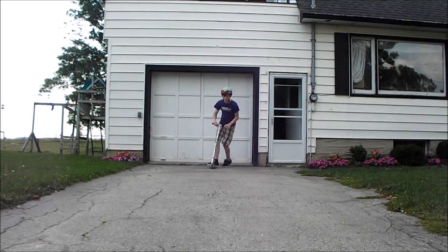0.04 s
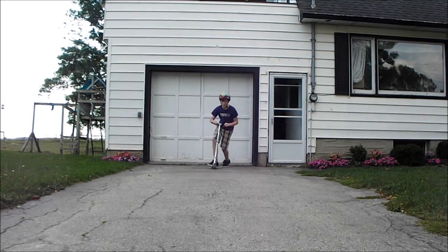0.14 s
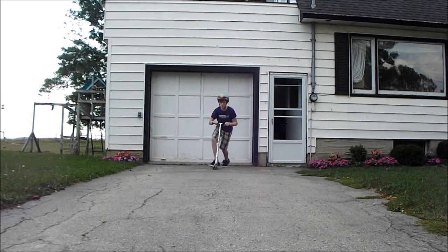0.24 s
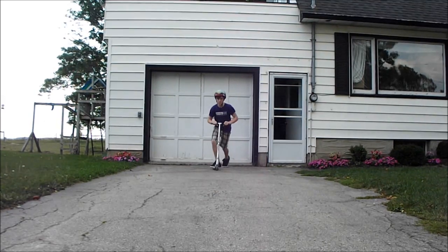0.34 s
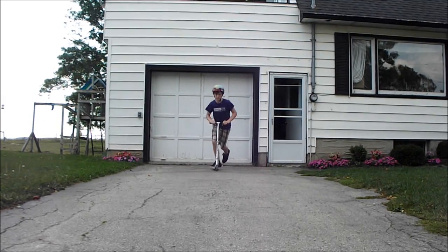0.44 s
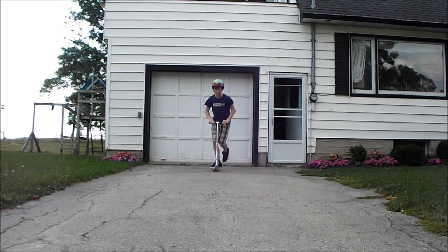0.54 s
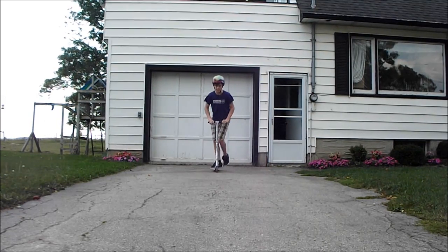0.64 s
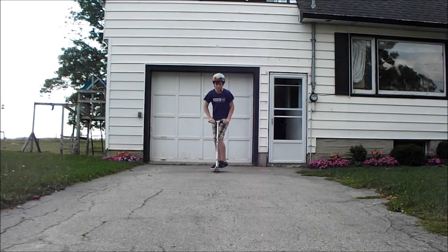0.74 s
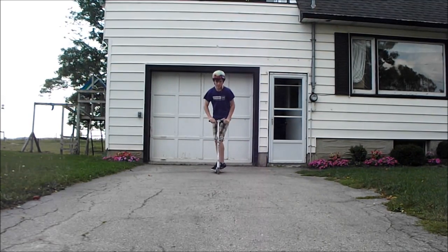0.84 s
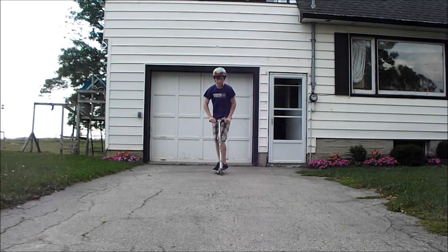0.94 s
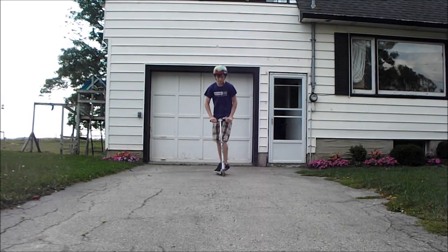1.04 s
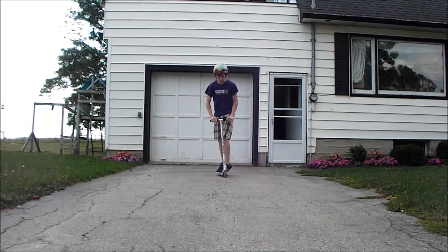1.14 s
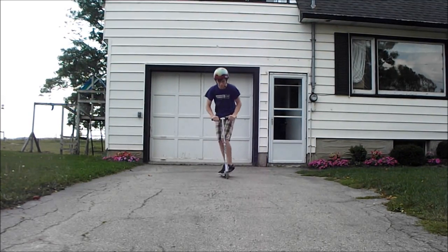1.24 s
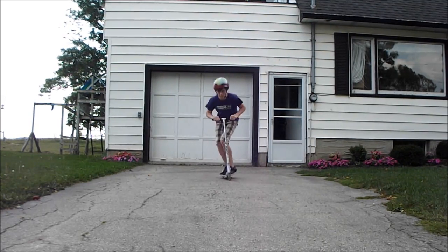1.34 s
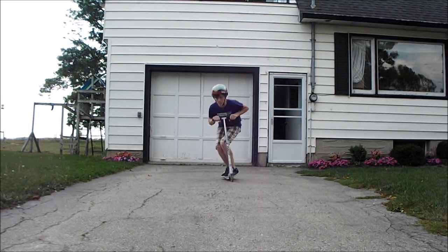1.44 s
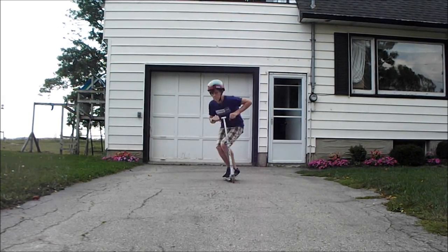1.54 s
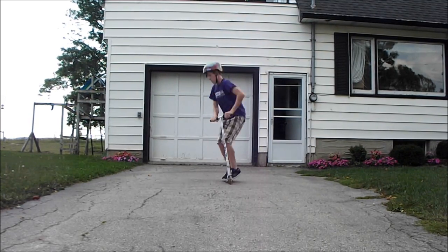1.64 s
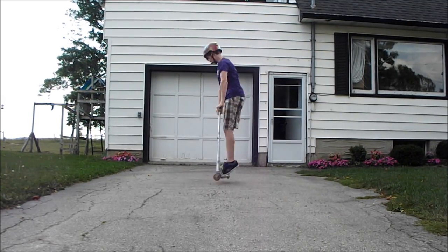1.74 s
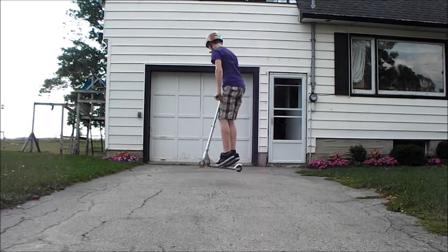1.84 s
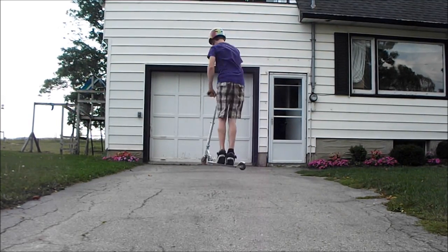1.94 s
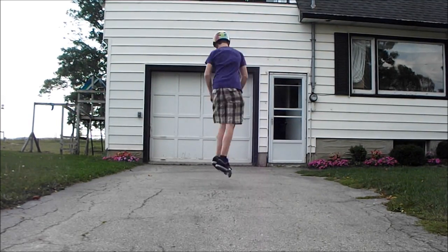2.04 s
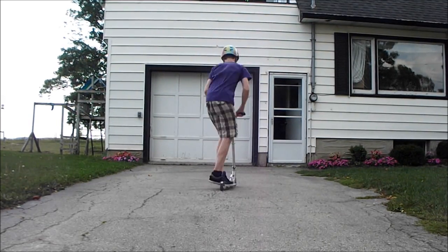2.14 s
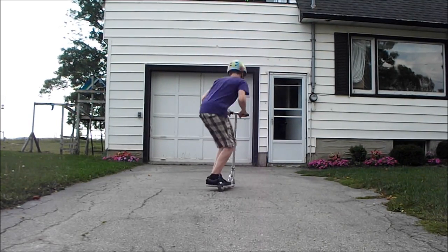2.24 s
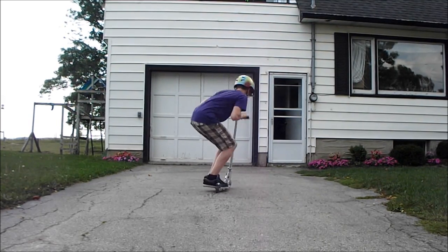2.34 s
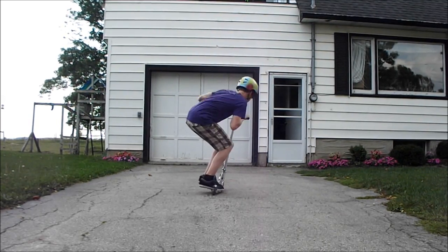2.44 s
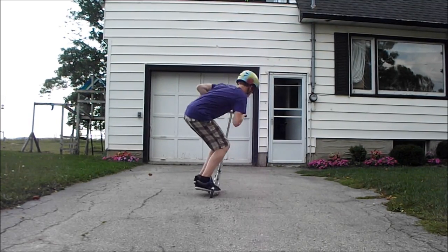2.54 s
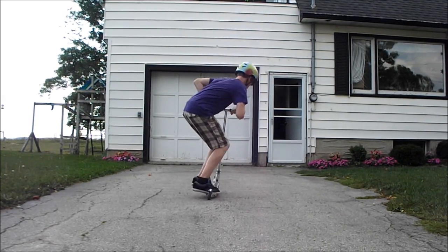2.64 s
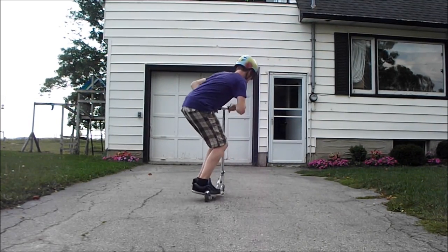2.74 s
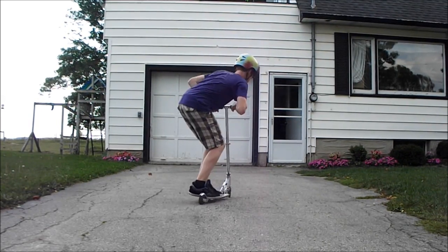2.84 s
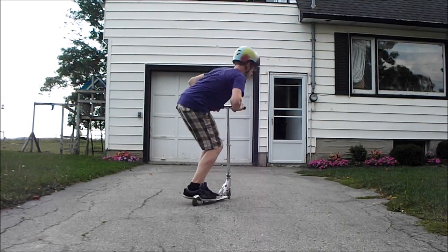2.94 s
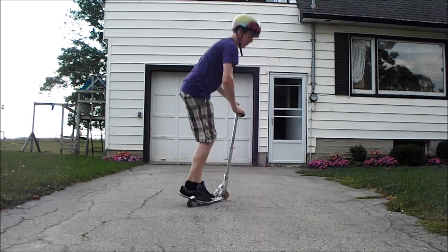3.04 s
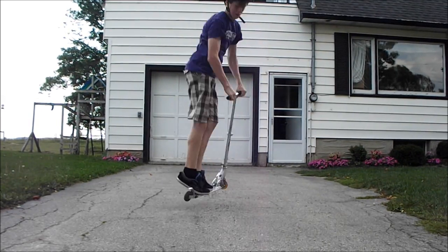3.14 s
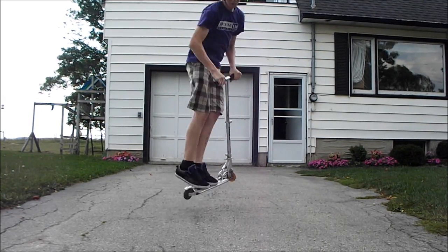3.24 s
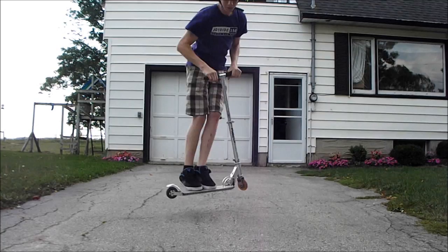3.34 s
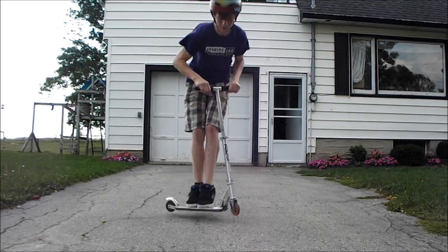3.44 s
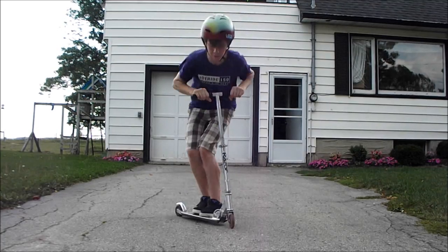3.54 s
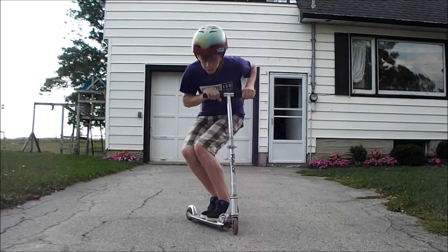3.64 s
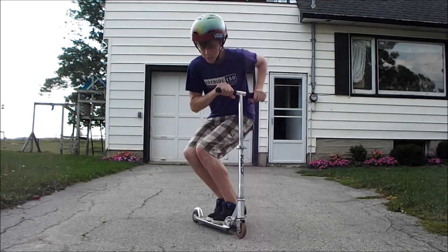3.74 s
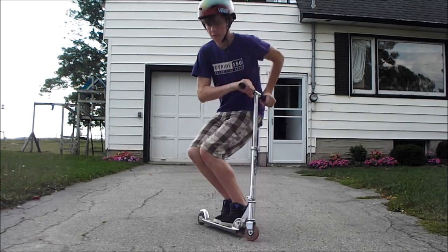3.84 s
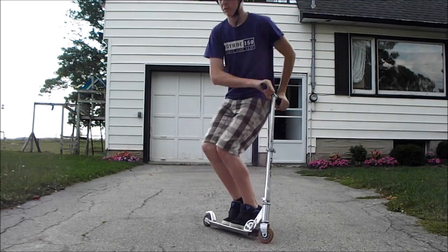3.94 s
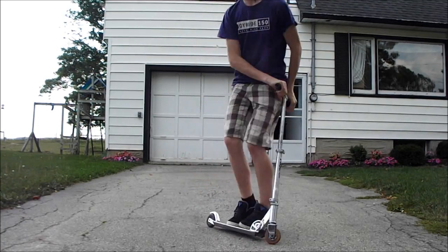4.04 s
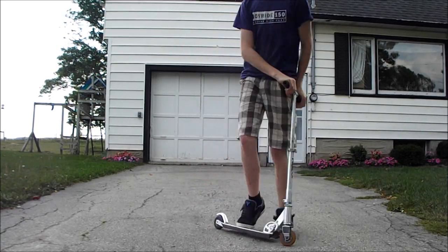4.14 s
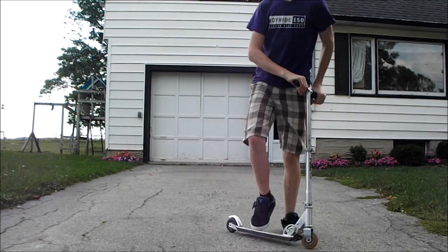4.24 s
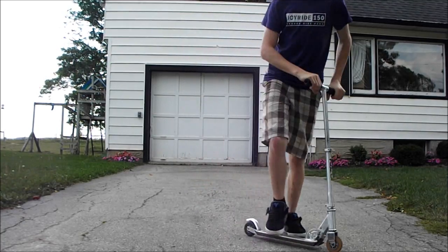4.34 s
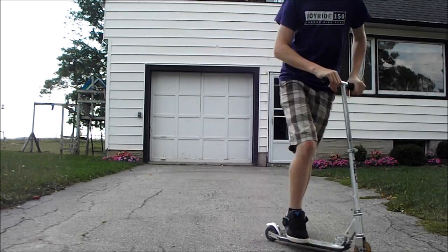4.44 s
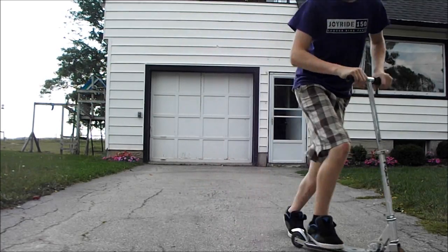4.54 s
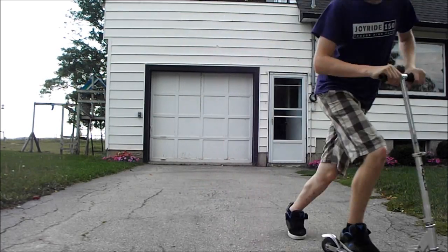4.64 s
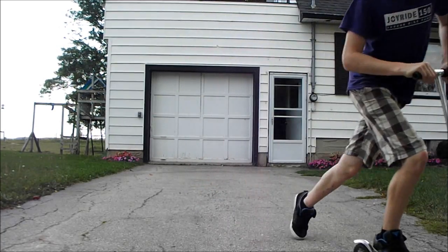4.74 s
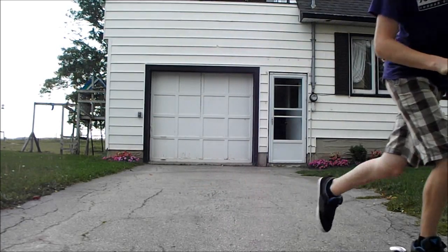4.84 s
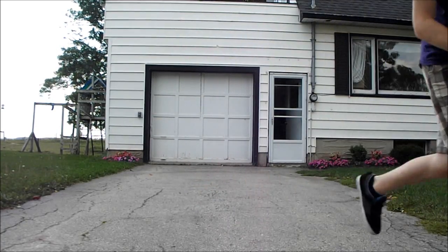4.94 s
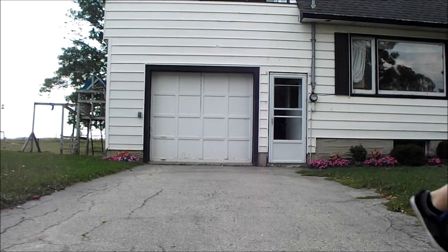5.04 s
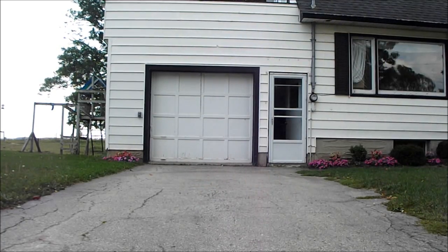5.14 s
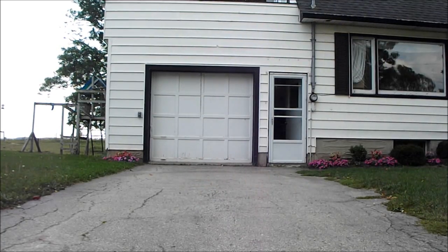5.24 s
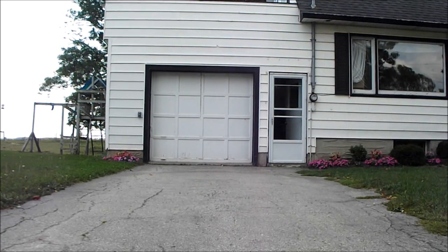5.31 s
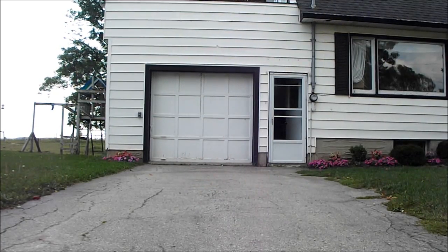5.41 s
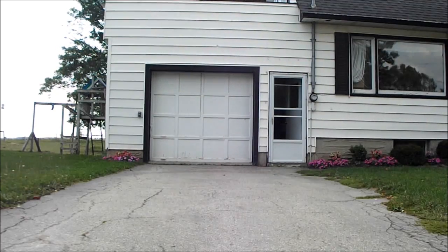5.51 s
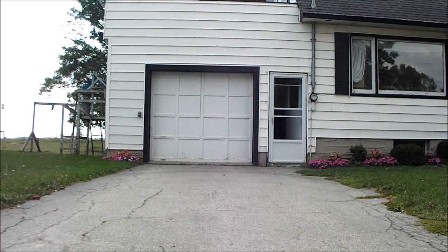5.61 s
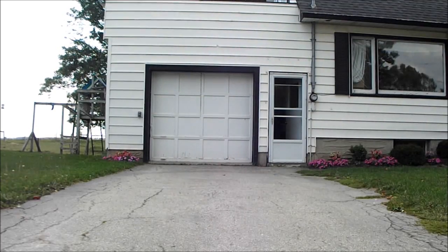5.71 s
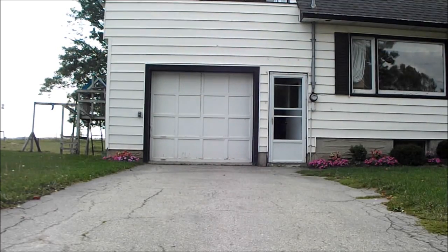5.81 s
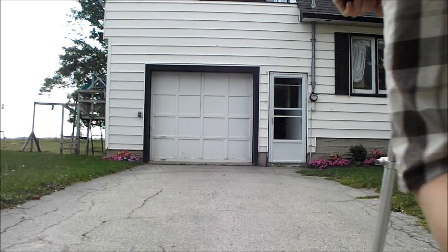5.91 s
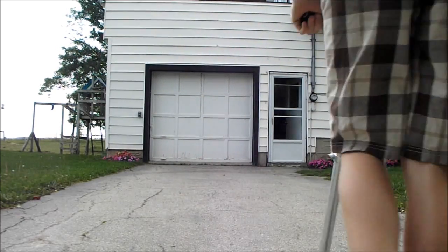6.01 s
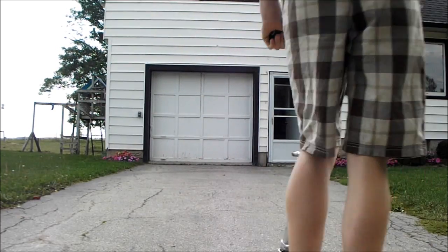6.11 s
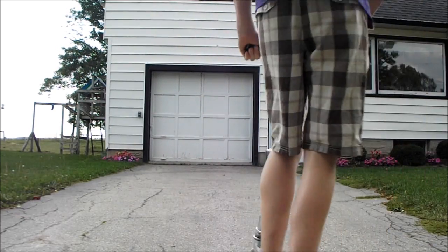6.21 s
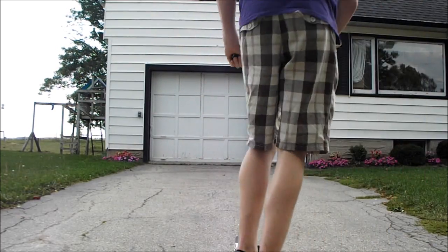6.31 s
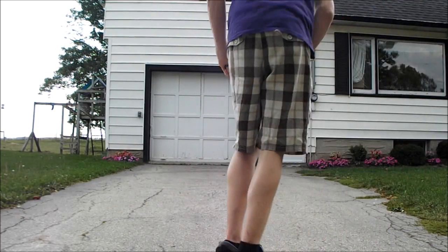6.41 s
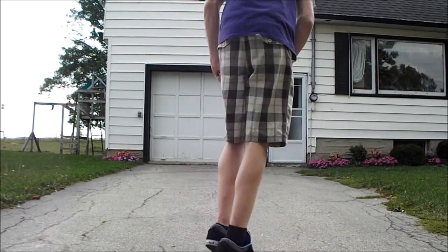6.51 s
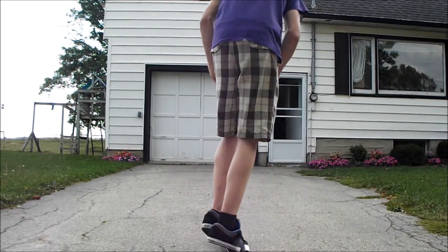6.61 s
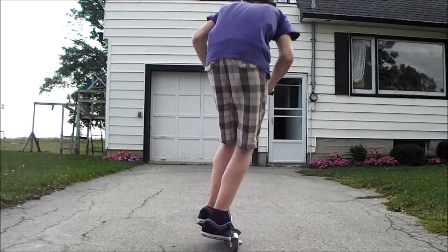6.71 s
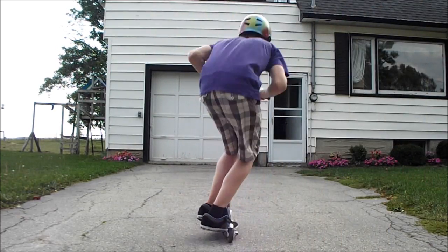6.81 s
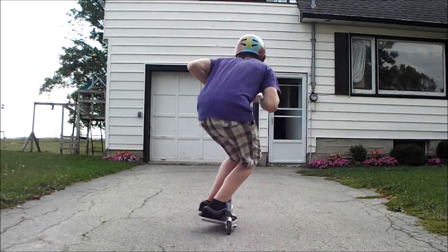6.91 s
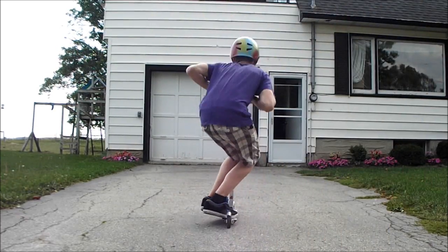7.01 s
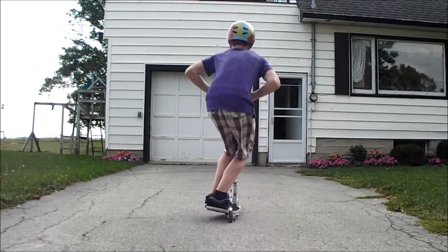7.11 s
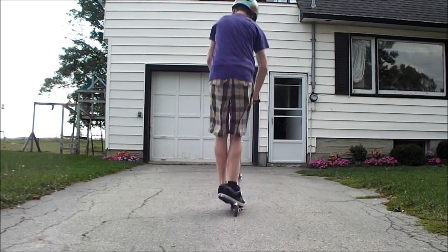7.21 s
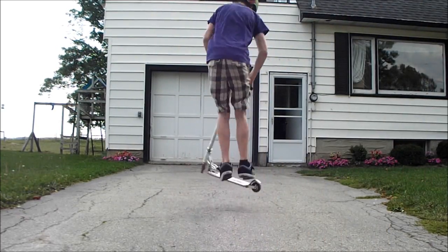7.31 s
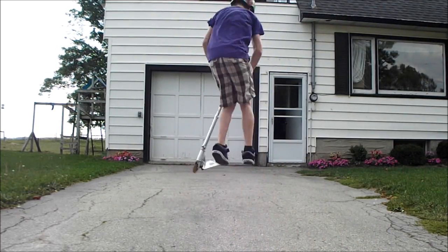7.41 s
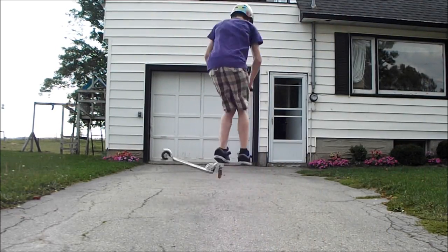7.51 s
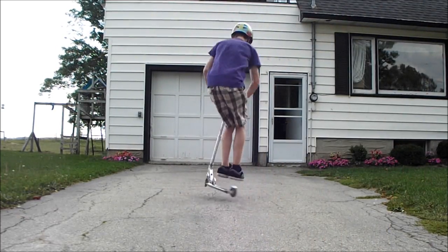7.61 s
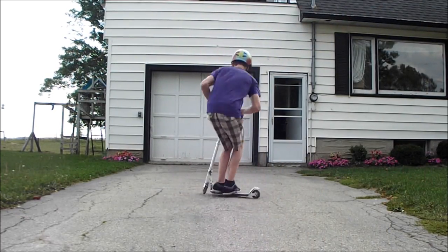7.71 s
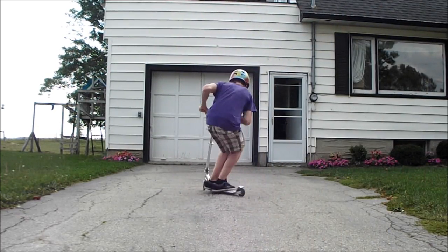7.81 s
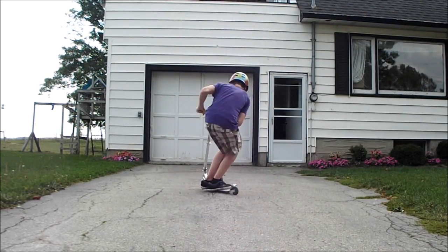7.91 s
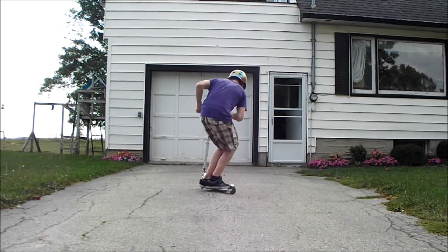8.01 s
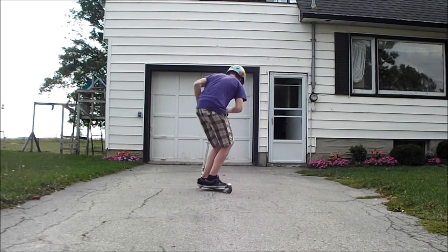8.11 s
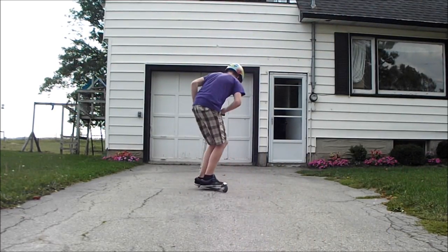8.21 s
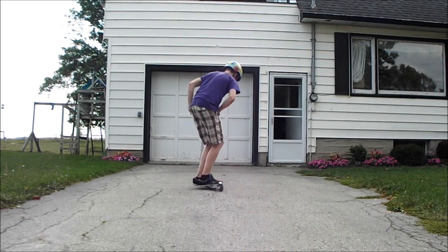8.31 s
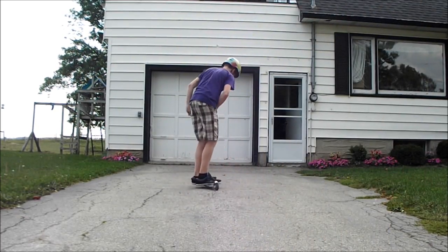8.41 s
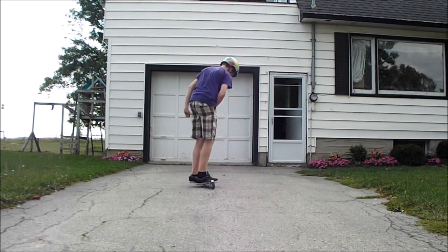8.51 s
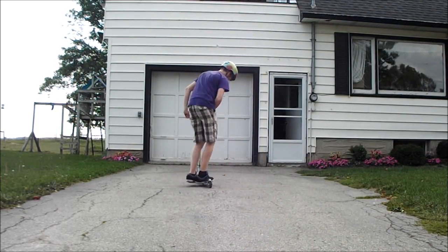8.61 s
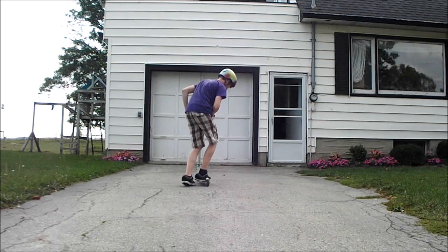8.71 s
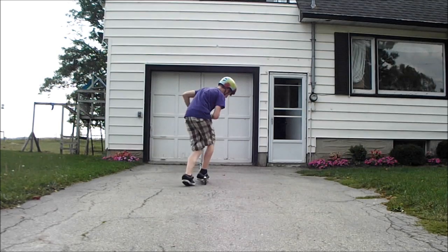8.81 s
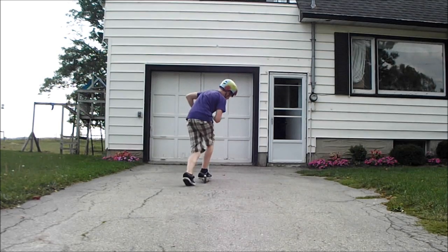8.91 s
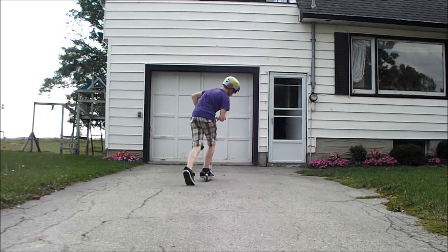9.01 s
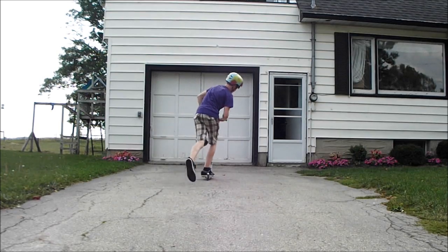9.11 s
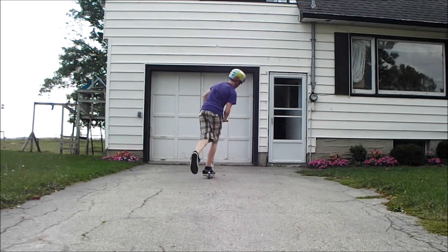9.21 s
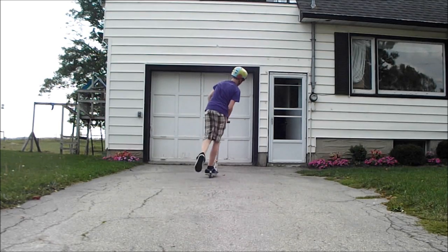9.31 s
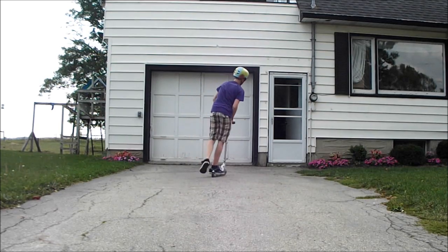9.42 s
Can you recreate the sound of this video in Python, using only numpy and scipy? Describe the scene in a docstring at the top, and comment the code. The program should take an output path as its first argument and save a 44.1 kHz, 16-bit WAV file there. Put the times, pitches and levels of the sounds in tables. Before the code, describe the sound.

An open driveway beside a house, with slight wall echoes and a low outdoor bed. From 0 s a truck engine drones, with faint metallic ticks from a scooter close at hand; tyre noise swells briefly around 1.5 s. A dry, woody double clack lands at 2.15 s, a lighter rattling one at 3.1 s, and a harder, brighter cluster at 3.46 s. The truck passes loudest around 4.3 s with throbbing boom, tyre roar, sinking tread hum and hiss, plus small ticks. At 5.5 s it cuts off abruptly with a hollow pop. Knocks and loose steel pings follow near 5.7 s as hard wheels patter past and recede over grit. A flat slap at 7.23 s leads to a sharp multiple clack at 7.66-7.75 s. Low wind gusts bump the microphone, strongest around 7.5-8.3 s; soft knocks come near 8.65 s, then a faint ping and scrapes.

```python
"""Scooter tricks on a driveway

A kick scooter clacks, slaps and pings on asphalt: shaped noise rings frame, fork and loose steel, and walls echo.
A truck passes, built from engine pulses, filtered road noise and sinking tyre tones, until a hard cut and a pop.
Then hard wheels roll away as random small impacts, while gusts of noise bump the microphone."""
import sys
import numpy as np
from scipy import signal
from scipy.fft import rfft, irfft, next_fast_len
from scipy.io import wavfile
from scipy.ndimage import uniform_filter1d

SR = 44100
rng = np.random.default_rng(int(sys.argv[2]) if len(sys.argv) > 2 else 0)


def to_wav(sig):
    """Store sig (one row per channel, or 1-D mono) as 16-bit WAV at the path in sys.argv[1].

    Samples outside -1..1 are clipped; the rate is SR.
    """
    pcm = np.clip(np.atleast_2d(sig), -1, 1) * 32767
    pcm = np.round(pcm).astype(np.int16)
    wavfile.write(sys.argv[1], SR, pcm.T)  # frames by channels


N = 417186
T = np.arange(N) / SR
CUT_S, TOP_HZ = 5.5145, 15800  # where the truck cuts to the rolling scooter; top of the sound

# steady background of the yard: (frequency [Hz], density [dB per Hz])
YARD_SPECTRUM = [(15, -21), (25, -0.5), (86, -2.5), (110, -14), (233, -11), (399, -30.5), (895, -27),
                 (2060, -27), (3530, -29), (4870, -27.5), (13500, -38), (15500, -42)]
YARD_DB = -46.5

# the truck drives by in a straight line, at this speed and closest distance
TRUCK_M_S, ROAD_M = 10.83, 8.14
# each part of the pass: (loudest time [s], level there [dB], loss per doubling of distance [dB])
DRONE_PASS = (4.3, -21, 9.66)
THROB_PASS = (3.87, -27, 3.35)
ROAR_PASS = (4.32, -25, 19.2)
WHINE_PASS = (4.77, -31, 6.1)
HISS_PASS = (4.15, -33.5, 3.3)
# engine speed: (time [s], firing rate [Hz])
ENGINE_SPEED = [(0, 96), (1.45, 89.7), (2.2, 87.5), (2.8, 82.76), (4.3, 78.91), (5.05, 74.84), (5.5, 73.8)]
# exhaust resonances: (frequency [Hz], width before narrowing [Hz], relative level [dB])
EXHAUST_MODES = [(244, 56, -7.5), (288, 78, 0), (551, 100, -7)]
# swells of the firing boom: (time [s], level before trim [dB])
BOOM_LEVEL = [(0, -31.5), (.55, -50), (1.2, -34.5), (2.2, -32.5), (2.45, -36), (3, -30.5), (3.62, -35),
              (3.82, -29), (4.2, -39), (4.7, -33), (5.25, -29), (5.5, -33)]
# low throb of the engine: (multiple of the crank rate, relative level [dB])
THROB_ORDERS = [(1, -5), (3, 1), (4, -15), (5, 0.5)]
# rumble of the truck's body: (frequency [Hz], density [dB per Hz])
BODY_RUMBLE = [(20, -16), (42, -34), (60, -1.5), (95, -3), (132, 1), (205, 1.5), (240, -5), (400, -7),
               (500, -8.5), (900, -44)]
# tyre roar, its upper band and the road hiss: (frequency [Hz], density [dB per Hz])
ROAR_SPECTRUM = [(210, -28), (360, -5.5), (487, -0.5), (560, -2), (684, -4), (794, -1.5), (890, -3),
                 (1200, -9.5), (1560, -20), (2640, -120)]
WHINE_SPECTRUM = [(700, -40), (1100, 0.5), (1450, 5.5), (1750, 3), (2200, -11), (3000, -47.5)]
HISS_SPECTRUM = [(1200, -20.5), (2000, 0.5), (2900, 2), (3830, -3), (4970, -5.5), (5750, -5.5), (6620, -11),
                 (9500, -17), (11500, -23.5), (15000, -41)]
# single swells of roar, hiss and pushed air: (time [s], half width [s], level [dB])
ROAR_SWELL = (1.51, 0.35, -30.5)
HISS_SWELL = (0.67, 0.22, -41.5)
WAKE_SWELL = (4, 0.98, -38)
FAR_ROAR_DB, FAR_WHINE_DB = -35, -39.5  # steady roar from farther along the road
# tones of the tyre tread: (frequency [Hz], relative level [dB])
TREAD_TONES = [(275, 0), (289, -6.5), (303, -2), (332, -13.5), (594, -11)]
# swells of the tread hum: (time [s], level before trim [dB])
TREAD_LEVEL = [(1.7, -62), (3.1, -35), (3.38, -23.5), (3.95, -19), (4.1, -23), (4.25, -15.5), (4.6, -25),
               (4.85, -19), (5.25, -23.5), (5.5, -28)]
TREAD_WANDER, TREAD_FLUTTER_DB = .012, 2.5  # pitch wander as a share; level flutter
# hollow resonances of the tyres: (frequency [Hz], width [Hz], relative level [dB])
HOWL_MODES = [(452, 90, -0.5), (790, 77, 3), (1090, 130, -5)]
# one swell of the tyre howl: (time [s], half width [s], level [dB])
HOWL_SWELL = (1.52, 0.31, -31)
# one swell of the narrow hiss: (time [s], half width [s], level [dB])
SIZZLE_SWELL = (3.86, 0.69, -46.5)
SIZZLE_HZ, SIZZLE_RATE = 5950, 490  # centre pitch; random steps per second that set the width

# ticks of fork, clamp and bars, and a few flicked stones: (time [s], relative level [dB], t60 [s], pitch [Hz],
# steel ring [dB])
RATTLE_TICKS = [(.018, -20.5, 0.1, 6500, -12), (.04, -22, 0.23, 6450, -10), (0.221, -23, 0.087, 5400, -4),
                (1.729, -19.5, 0.093, 9000, -8), (1.756, -22, 0.069, 9000, 1),
                (1.78, -25, 0.056, 10000, -6), (2.742, -17.5, 0.06, 10000, -9),
                (3.055, -17.5, 0.081, 9000, 1), (3.108, -12.5, 0.07, 10000, -9),
                (3.171, -17.5, 0.065, 8000, -3), (4.3186, -16.5, .05, 8000, -12),
                (4.3864, -11, 0.079, 7500, -9), (4.4657, -18.5, 0.078, 9500, -5),
                (4.518, -17, 0.079, 8500, -5), (5.306, -15.5, 0.077, 7960, -5),
                (5.643, -16, .03, 6500, -10), (5.6737, -15, 0.089, 7500, -10),
                (5.699, -16, 0.032, 5500, -8), (5.917, -19, 0.043, 4630, -17),
                (6.1021, -15, 0.014, 5800, -12), (6.111, -18, .015, 5800, -12),
                (6.2133, -24, 0.027, 6500, -6), (6.2438, -25, .03, 7700, -5),
                (6.5985, -19.5, 0.068, 6000, -20), (6.621, -23, .06, 3700, -12),
                (6.652, -21, 0.054, 5000, -12), (6.733, -25.5, 0.091, 8000, -8),
                (6.847, -29, 0.054, 8500, -10), (7.3216, -16, 0.019, 7500, -4), (7.37, -21, 0.07, 4000, -9),
                (7.595, -25, 0.12, 8000, -6), (7.7532, -13, .03, 10500, -10)]
# bouts of the loose steel brake pinging: (time [s], length [s], relative level [dB])
BRAKE_PINGS = [(0.032, .008, -27), (0.182, .03, -34), (0.229, .03, -32), (1.291, 0.03, -36),
               (2.253, 0.0071, -30.5), (5.703, .008, -20.5), (6.166, .008, -18.5), (6.6734, .008, -26.5),
               (6.713, .008, -35), (8.939, .008, -32.5), (8.966, .045, -44)]
PING_GAP_S, PING_FADE_DB, PING_SCATTER_DB = .012, -4, 1.5  # mean gap; loss over a bout; spread of touches
# modes of the brake: (frequency [Hz], relative level [dB], t60 [s])
BRAKE_MODES = [(3770, -16, .06), (5230, -6, .035), (5380, -1, .05), (5560, -7, .03), (6330, -13, .04),
               (8860, -13, .06), (10200, -13, .05), (10500, -15, .05), (11850, -16, .06)]
# echoes from house and garage: (delay [s], level [dB])
WALL_ECHOES = [(0.028, -17.5), (0.051, -18.5)]
# deck and wheels striking asphalt:
# (time [s], relative level [dB], relative treble [dB], t60 [s], change per rebound [dB])
DECK_CLACKS = [(2.1427, -10, -13, 0.077, -22), (2.159, -10.5, -11, 0.053, -10), (2.169, -12, -9, .04, -18),
               (2.1878, -14, -16, 0.035, -14), (3.0741, -15.5, -5, 0.042, -11),
               (3.0791, -12.5, -4, .035, -14), (3.452, -11, -9, .02, -20), (3.4555, -5, -4.5, 0.031, -15),
               (3.463, -10, -5, .03, -14), (3.469, -7, -6, 0.032, -13), (3.4985, -25, -5, .08, -4),
               (7.2256, -12, -6, 0.036, -4), (7.322, -24, 0, 0.054, -10), (7.659, -16, -2, 0.034, -20),
               (7.662, -8.5, -0.5, 0.039, -6.5), (7.6704, -8.5, 2, 0.047, -10.5),
               (7.6972, -6, -7, 0.028, -13), (7.732, -16, -13, 0.023, -11), (8.648, -37, -24, 0.016, -14)]
REBOUND_S = .0187  # gap between a blow and each rebound
# modes of deck and stem: (frequency [Hz], width, at least 85 in use [Hz], relative level [dB])
FRAME_MODES = [(1280, 130, -18), (1710, 79, -17), (3070, 210, -4), (4940, 110, -4), (5380, 130, 0.5),
               (5620, 82, -1), (5900, 90, -9), (8400, 310, -7), (9400, 200, -5), (10500, 110, 0)]
# contact crack: (frequency [Hz], density [dB per Hz])
CRACK_SPECTRUM = [(200, -7), (600, 2.5), (1200, 5.5), (2200, 0), (3800, -6.5), (6000, -7.5), (10000, -8),
                  (13000, -12), (16000, -18)]
# knocks of shoes and wheels: (time [s], tone level [dB], pitch [Hz], t60 [s], scuff to tone [ratio])
DECK_KNOCKS = [(2.1445, -19, 480, .05, .8), (2.161, -18, 1130, 0.042, 1.56), (3.456, -24, 630, .05, 0.73),
               (5.616, -25.5, 960, 0.06, 0.59), (5.632, -23, 1064, 0.088, 0.44),
               (5.643, -25, 1040, 0.05, .6), (5.6763, -9.5, 1105, 0.036, 0.17),
               (5.678, -9, 917, 0.043, 0.21), (5.698, -20, 1084, 0.037, 0.74),
               (5.917, -24.5, 1000, 0.067, 0.62), (6.025, -25.5, 1260, 0.033, 0.17),
               (7.663, -19, 1766, 0.096, 0.74), (8.65, -30, 350, 0.014, 1.8),
               (8.676, -29.5, 453, 0.025, 0.61)]
# a wheel slapped flat on the ground: (time [s], level [dB], t60 [s])
WHEEL_SLAPS = [(2.1448, -15, 0.02), (2.1622, -18, .03), (3.456, -14, 0.021), (7.2258, -8.5, 0.021),
               (7.663, -14, 0.02), (8.6485, -27, 0.016)]
# modes of wheel and fork: (frequency [Hz], relative level [dB])
FORK_MODES = [(1260, -4.5), (1850, -11), (2500, -5), (2920, -6), (3900, -4.5), (6850, -10.5), (10000, -15)]
# squeaks of soles and bearings: (time [s], length [s], peak level [dB], pitch [Hz], rise [share of pitch])
DRY_SQUEAKS = [(3.208, 0.068, -37, 10400, -0.004), (6.091, 0.013, -33.5, 2070, 0.26),
               (6.493, 0.02, -40, 1850, 0.037), (8.915, 0.06, -50, 8900, 0.014)]

# patter of the hard wheels: (frequency [Hz], density [dB per Hz])
WHEEL_SPECTRUM = [(110, -42), (190, -1.5), (419, 1.5), (746, -2.5), (994, -2), (1370, -10.5), (1870, -14.5),
                  (2400, -16.5), (4050, -19.5), (5020, -23), (5490, -18), (6580, -29), (10500, -22.5),
                  (14000, -35)]
# the scooter passes beside the microphone, then rolls off; its distance is held at FAR_M
ROLL_DB, BESIDE_S, BESIDE_M, SCOOTER_M_S, FAR_M = -33.6, 5.67, 1.11, 4.97, 10
# loose stones under the wheels: (pitch [Hz], relative level [dB])
PEBBLE_SIZES = [(1400, 0), (2600, -8.5), (4300, 3), (6200, -1)]
PEBBLES_PER_S = 38  # hits on each size
# wind at the microphone: (frequency [Hz], density [dB per Hz])
WIND_SPECTRUM = [(13, -43), (22, -20.5), (90, -4), (163, -10), (200, -21), (258, -21), (400, -35),
                 (520, -60), (880, -120)]
# gusts over the breeze: (time [s], half width [s], level [dB])
WIND_GUSTS = [(5.9, 0.42, -45), (6.65, 0.23, -43), (7.12, 0.11, -40.5), (7.53, 0.045, -36),
              (7.7, 0.066, -39.5), (8.06, 0.036, -36), (8.308, 0.061, -35.5), (8.68, 0.12, -45.5),
              (9.27, 0.052, -36)]
BREEZE_DB = -58
# strongest single eddies: (time [s], relative level [dB], pitch [Hz])
WIND_BUFFETS = [(6.217, -33, 208), (6.881, -31, 188), (6.991, -32, 106), (7.222, -28.5, 89.5),
                (7.482, -30, 196), (8.327, -28, 115)]
# soles and wheels scraping over grit: (time [s], length [s], level [dB], pitch [Hz])
GRIT_SCRAPES = [(5.589, 0.12, -32, 4170), (5.607, 0.046, -31.5, 1200), (6.136, 0.075, -43, 5000),
                (6.586, 0.093, -45, 3300), (6.629, .12, -50, 1800), (6.701, 0.3, -55, 1180),
                (6.95, 0.4, -55, 5000), (7.195, 0.044, -38, 2600), (7.226, 0.12, -46, 2400),
                (7.3, 0.16, -46, 2600), (8.903, 0.044, -44, 5000), (9.24, 0.1, -53.5, 4000)]
# between the two ports: (frequency [Hz], lag of the left [samples], relative unshared sound [dB])
PORT_SPREAD = [(30, .1, -38), (120, .1, -46), (500, .15, -38), (1000, .2, -28), (2500, .4, -19),
               (5000, .93, -13), (9000, .97, -11), (13000, 1, -9)]


def undb(db):
    """Decibels to gain."""
    return 10 ** (np.asarray(db) / 20)


def unit(x):
    """Scale to rms 1."""
    return x / np.sqrt(np.mean(x ** 2) + 1e-20)


def noise(size=N):
    """White noise."""
    return rng.standard_normal(size)


def curve(table):
    """Draw a (time, value) table as a line through every sample."""
    s, values = np.transpose(table)
    return np.interp(T, s, values)


def colour(x, points):
    """Minimum-phase filter with the given (Hz, dB) outline, made by folding its cepstrum."""
    hz, db = np.transpose(points)
    size = next_fast_len(len(x) + 4096, True) // 2 * 2
    f = np.maximum(np.fft.rfftfreq(size, 1 / SR), 1)
    outline_db = np.interp(np.log(f), np.log(hz), db)
    cepstrum = irfft(np.log(undb(outline_db)))
    cepstrum[1:size // 2] *= 2
    cepstrum[size // 2 + 1:] = 0
    return irfft(rfft(x, size) * np.exp(rfft(cepstrum)))[:len(x)]


def resonate(x, hz, width_hz):
    """One resonance, gain 1 at its centre."""
    return signal.lfilter(*signal.iirpeak(hz, hz / width_hz, fs=SR), x)


def resonate_twice(x, hz, width_hz):
    """The same resonance twice over, for steeper skirts."""
    return resonate(resonate(x, hz, width_hz), hz, width_hz)


def above(x, hz):
    """Second-order high-pass."""
    return signal.sosfilt(signal.butter(2, hz, "high", fs=SR, output="sos"), x)


def fade(t, t60):
    """Exponential decay, down 60 dB at t60."""
    return np.exp(-np.log(1000) * t / t60)


def walk(rate):
    """Smooth random wander of rms 1, with this many new values a second."""
    k = int(SR / rate)
    steps = np.repeat(noise(N // k + 1), k)
    return unit(uniform_filter1d(uniform_filter1d(steps, k), k)[:N])


def roughness(size, rate):
    """Noise of rms 1 averaged over 1/rate seconds."""
    return unit(uniform_filter1d(noise(size), SR // rate))


def grains(rate, spread_db):
    """Random tiny impacts of very unequal size, this many a second."""
    hits = rng.random(N) < rate / SR
    return hits * noise() * undb(spread_db * np.minimum(rng.exponential(size=N), 4))


def add(out, s, sound):
    """Mix a sound in at time s."""
    i = int(s * SR)
    out[i:i + len(sound)] += sound[:len(out) - i]


def burst(t, t60, rise_s, clump_db=3):
    """An uneven chatter of contacts that builds quickly and dies away."""
    clumps = undb(clump_db * np.clip(roughness(len(t), 600), -2, 2))
    return noise(len(t)) * unit(clumps) * fade(t, t60) * (1 - np.exp(-t / rise_s))


def swell(s, half_width_s, db):
    """A bell-shaped rise and fall of gain."""
    return undb(db) * np.exp(-.5 * ((T - s) / half_width_s) ** 2)


def passing(s, db, doubling_db):
    """Gain of a part of the truck as it nears, draws level and leaves."""
    distance = np.hypot(ROAD_M, TRUCK_M_S * (T - s))
    return undb(db - doubling_db * np.log2(distance / ROAD_M))


def doppler():
    """Pitch ratio of the truck: above 1 while it nears, below as it leaves."""
    along = TRUCK_M_S * (T - DRONE_PASS[0])
    return 1 - TRUCK_M_S / 343 * along / np.hypot(ROAD_M, along)


def yard():
    """A steady, mostly low bed of coloured noise."""
    return unit(colour(noise(), YARD_SPECTRUM)) * undb(YARD_DB + 0.1 * walk(6.3))


def engine(scatter=0.32, second_firing=0.013, boom_db=-2):
    """Uneven firing pulses and gas noise ring the exhaust, over a boom and a low throb."""
    turns = np.cumsum(curve(ENGINE_SPEED) / 2 * (1 + 0.01204 * walk(14))) / SR
    # two firings to a crank turn, the second very weak: this fills in the half orders
    first = np.diff(np.floor(turns), prepend=0)
    second = np.diff(np.floor(turns + .5), prepend=0)
    pulses = (first + second_firing * second) * (1 + scatter * walk(60))
    exhaust_gas = unit(above(pulses, 23)) + noise()
    drone = sum(undb(db) * resonate_twice(exhaust_gas, hz, 0.94 * w) for hz, w, db in EXHAUST_MODES)
    boom = np.sin(4 * np.pi * turns) * undb(walk(18))
    orders = sum(undb(db + 2 * walk(9.1)) * np.sin(2 * np.pi * k * turns) for k, db in THROB_ORDERS)
    throb = undb(-7.5) * unit(orders) + unit(colour(noise(), BODY_RUMBLE))
    return (unit(drone) * passing(*DRONE_PASS) + unit(boom) * undb(curve(BOOM_LEVEL) + boom_db)
            + unit(throb) * passing(*THROB_PASS))


def roar():
    """Tyre roar: mid-band noise from the pass, one early swell and the far road."""
    gain = np.sqrt(passing(*ROAR_PASS) ** 2 + swell(*ROAR_SWELL) ** 2 + undb(FAR_ROAR_DB) ** 2)
    return unit(colour(noise(), ROAR_SPECTRUM)) * gain * undb(.5 * walk(40))


def whine(swell_db=-13):
    """Upper band of the tyre roar, sharing its swell at a lower level."""
    early = swell(*ROAR_SWELL) * undb(swell_db)
    gain = np.sqrt(passing(*WHINE_PASS) ** 2 + early ** 2 + undb(FAR_WHINE_DB) ** 2)
    return unit(colour(noise(), WHINE_SPECTRUM)) * gain * undb(0.31 * walk(25))


def hiss():
    """Tyre hiss on the road as bright noise, plus one early swell of bright hiss."""
    gain = np.hypot(passing(*HISS_PASS), swell(*HISS_SWELL))
    return unit(colour(noise(), HISS_SPECTRUM)) * gain * undb(0.94 * walk(30))


def wake():
    """Air pushed by the truck buffets the microphone around 28 Hz."""
    return unit(resonate_twice(noise(), 28, 22)) * swell(*WAKE_SWELL)


def tread():
    """The tyre tread hums in a few close, slightly unsteady tones that sink as the truck goes by."""
    out = np.zeros(N)
    for hz, db in TREAD_TONES:
        pitch = hz * doppler() * (1 + TREAD_WANDER * walk(22))
        flutter = undb(db + TREAD_FLUTTER_DB * walk(16))
        out += flutter * np.sin(2 * np.pi * np.cumsum(pitch) / SR)
    return unit(out) * undb(curve(TREAD_LEVEL) - 1)


def howl():
    """For a moment the tyres ring in a few hollow resonances."""
    air = noise()
    rings = sum(undb(db) * resonate_twice(air, hz, w) for hz, w, db in HOWL_MODES)
    return unit(rings) * swell(*HOWL_SWELL)


def sizzle():
    """A narrow band of hiss, shifted up while the truck nears and down as it leaves."""
    carrier = np.sin(2 * np.pi * np.cumsum(SIZZLE_HZ * doppler()) / SR)
    return unit(walk(SIZZLE_RATE) * carrier) * swell(*SIZZLE_SWELL)


def truck():
    """Engine, tyres and pushed air of the passing truck together, with an early swell of hiss."""
    return engine() + roar() + whine() + hiss() + wake() + tread() + howl() + sizzle()


def brake(t, buzz=0.6):
    """The loose steel buzzes against its pin as it rings, its modes slightly retuned at each touch."""
    out = np.zeros(len(t))
    for hz, db, t60 in BRAKE_MODES:
        shake = 1 + buzz * roughness(len(t), 500)
        pitch = hz * (1 + 0.0094 * rng.standard_normal())
        out += undb(db) * shake * np.sin(2 * np.pi * pitch * t) * fade(t, t60)
    return out * (1 - np.exp(-t / 0.0022))


def bout(s, length_s, gap_s, count=12):
    """Times and gains of a loose part's touches: uneven, and weaker towards the end."""
    gaps, sizes = rng.uniform(.7, 1.3, count), rng.standard_normal(count)
    late = gap_s * (np.cumsum(gaps) - gaps[0])
    scatter_db = PING_SCATTER_DB * sizes * (late > 0)  # none on the first touch
    gain = undb(PING_FADE_DB * late / max(length_s, gap_s) + scatter_db)
    return [(s + d, g) for d, g in zip(late, gain) if d <= length_s]


def rattles(ping_tick_db=-2):
    """Loose parts and a few flicked stones tick, each around its own pitch, and set the brake ringing."""
    t = T[:SR // 4]
    ticks, rings = np.zeros(N), np.zeros(N)
    for s, db, t60, hz, ring_db in RATTLE_TICKS:
        tick = resonate(burst(t, t60, rise_s=0.0013), hz, hz)
        add(ticks, s, undb(db + 2) * tick)
        add(rings, s, undb(db + ring_db - 8.5) * brake(t))
    for start, length_s, db in BRAKE_PINGS:
        for s, gain in bout(start, length_s, PING_GAP_S):
            add(ticks, s, gain * undb(db + ping_tick_db) * burst(t, 0.031, rise_s=0.00093))
            add(rings, s, gain * undb(db) * brake(t))
    return undb(-0.5) * above(colour(ticks, CRACK_SPECTRUM), 1500) + undb(2) * rings


def driveway(x, t60=0.64, tail_db=-15):
    """Two wall echoes and a thin tail scattered by siding, hedge and trees."""
    t = T[:SR * 3 // 4]
    tail = colour(noise(len(t)), [(200, -16), (1200, -2), (5500, 2), (9000, -4), (15000, -8.5)])
    tail *= fade(t, t60) * (1 - np.exp(-t / 0.0035))
    response = undb(tail_db) * tail / np.sqrt(np.sum(tail ** 2))
    for s, db in WALL_ECHOES:
        response[int(s * SR)] += undb(db)
    return signal.fftconvolve(x, response)[:N]


def clacks(ring_db=3, split_hz=4800, thud_db=-13, count=3):
    """Each blow and its two rebounds crack, ring the frame and thud through the deck."""
    t = T[:SR // 4]
    dull, bright = np.zeros(N), np.zeros(N)
    for s, db, treble_db, t60, rebound_db in DECK_CLACKS:
        for k in range(count):
            chatter = burst(t, t60, rise_s=0.002) * undb(db + k * rebound_db)
            # more treble means less body
            add(dull, s + k * REBOUND_S, chatter * undb(-.3 * (treble_db + 32)))
            add(bright, s + k * REBOUND_S, chatter * undb(treble_db + 9))
    low = signal.sosfilt(signal.butter(2, split_hz, fs=SR, output="sos"), dull)
    # subtracted, so the two bands do not cancel at the split
    force = colour(low - above(bright, split_hz), CRACK_SPECTRUM)
    ring = sum(undb(db) * resonate(force, hz, max(w, 85)) for hz, w, db in FRAME_MODES)
    thud = resonate(dull, 760, 500)
    return undb(5) * (force + undb(ring_db) * ring + undb(thud_db) * thud)


def knocks():
    """Shoe and wheel knock the deck: one damped tone with a scuff around it."""
    t, out = T[:SR // 8], np.zeros(N)
    for s, db, hz, t60, scuff in DECK_KNOCKS:
        rub = unit(resonate(noise(len(t)), hz, hz))
        add(out, s, undb(db) * (np.sin(2 * np.pi * hz * t) + scuff * rub) * fade(t, t60))
    return out


def slaps(rough=0.56, rise_s=0.00063):
    """A short hard contact rings wheel and fork, roughened by the asphalt: a dry, woody clack."""
    t, out = T[:SR // 8], np.zeros(N)
    for s, db, t60 in WHEEL_SLAPS:
        envelope = fade(t, t60) * (1 - np.exp(-t / rise_s))
        for hz, mode_db in FORK_MODES:
            shake = 1 + rough * roughness(len(t), 1200)
            pitch = hz * (1 + 0.022 * rng.standard_normal())
            tone = np.sin(2 * np.pi * (pitch * t + rng.random()))
            add(out, s, undb(db + mode_db) * shake * tone * envelope)
    return out


def squeaks(waver_hz=60):
    """Rubber or a dry bearing sticks and slips: a brief, unsteady, gliding tone."""
    out = np.zeros(N)
    for s, length_s, db, hz, rise in DRY_SQUEAKS:
        size = int(length_s * SR)
        glide = hz * (1 + rise * np.linspace(0, 1, size))
        pitch = glide + waver_hz * roughness(size, 700)
        add(out, s, undb(db) * np.hanning(size) * np.sin(2 * np.pi * np.cumsum(pitch) / SR))
    return out


def pebbles(t60=0.028):
    """Loose stones tick under the wheels, many and small, each size at its own pitch."""
    out = np.zeros(N)
    for hz, db in PEBBLE_SIZES:
        hits = (rng.random(N) < PEBBLES_PER_S / SR) * rng.random(N)
        chatter = signal.fftconvolve(hits, fade(T[:SR // 20], t60))[:N] * noise()
        out += undb(db) * unit(resonate_twice(chatter, hz, hz / 2))
    return unit(out)


def rolling(sing_db=-9, grit_db=-16, pebble_db=-11, bump_db=-12):
    """Hard wheels patter over asphalt, bump, sing, crunch grit and flick pebbles, fading with distance."""
    distance = np.minimum(np.hypot(BESIDE_M, SCOOTER_M_S * (T - BESIDE_S)), FAR_M)
    patter = unit(colour(grains(3500, 2), WHEEL_SPECTRUM)) * undb(1.6 * walk(25))
    sing = unit(resonate_twice(noise(), 1050, 330))
    grit = unit(resonate(grains(900, 2), 6000, 6000))
    bumps = unit(resonate_twice(grains(130, 1.5), 950, 900))
    wheels = patter + undb(bump_db) * bumps + undb(sing_db) * sing
    wheels += undb(grit_db) * grit + undb(pebble_db) * pebbles()
    return wheels * undb(ROLL_DB) / distance


def wind():
    """Small eddies bump the microphone, harder in the gusts, with a few single strong swings."""
    strength = np.sqrt(undb(BREEZE_DB) ** 2 + sum(swell(*gust) ** 2 for gust in WIND_GUSTS))
    eddies = colour(grains(500, 5.4), WIND_SPECTRUM)
    # even out the chance level over 80 ms so the gusts set the loudness
    out = eddies / np.sqrt(uniform_filter1d(eddies ** 2, int(.08 * SR)) + 1e-12) * strength
    half = SR // 50
    for s, db, hz in WIND_BUFFETS:
        swing = 2 * np.pi * hz * (T[:2 * half] - T[half])
        add(out, s - T[half], -undb(db + 7.5) * swing * np.exp(-swing ** 2 / 2))
    return out


def pop():
    """A short hollow pop just after the cut: a bright tick, then a duller, two-toned one."""
    t, out = T[:SR // 16], np.zeros(N)
    add(out, 5.5185, -undb(-5) * np.sin(2 * np.pi * 2100 * t) * fade(t, 0.0098))
    add(out, 5.5198, undb(-3.5) * np.sin(2 * np.pi * 520 * t) * fade(t, 0.012))
    add(out, 5.5198, undb(-8.5) * np.sin(2 * np.pi * 880 * t) * fade(t, 0.016))
    return out


def scrapes():
    """Grit cracks under a sliding sole or wheel: a short swell of uneven grains."""
    out = np.zeros(N)
    for s, length_s, db, hz in GRIT_SCRAPES:
        size = int(length_s * SR)
        grit = unit(resonate_twice(grains(2200, 2.2)[:size], hz, hz))
        add(out, s, undb(db) * np.hanning(size) * grit)
    return out


def ports(x):
    """Two close ports: in the treble the left hears a little later and the two differ."""
    hz, lag, apart_db = np.transpose(PORT_SPREAD)
    f = np.fft.rfftfreq(N, 1 / SR)
    turn = np.exp(1j * np.pi * f * np.interp(f, hz, lag) / SR)  # half the lag for each side
    side = colour(x, np.transpose([hz, apart_db])) * walk(1400)
    left = irfft(rfft(x + side) / turn, N)
    right = irfft(rfft(x - side) * turn, N)
    return np.array([left, right])


def scene():
    """Truck before the cut, wheels and wind after it, the scooter's blows throughout."""
    after = np.clip((T - CUT_S) * SR / 32, 0, 1)  # crossfade over 32 samples
    air = yard() + truck() * (1 - after) + (rolling() + wind()) * after
    blows = clacks() + slaps()
    small = rattles() + scrapes() + squeaks()
    # the loud blows carry to the house front more than the small rattles
    echo = driveway(blows + .35 * small)
    return ports(air + blows + small + knocks() + pop() + echo)


def record(dry):
    """Round off peaks near full scale and cut everything above the top frequency."""
    rounded = dry / (1 + dry ** 8) ** (1 / 8)
    return signal.sosfilt(signal.ellip(10, .1, 90, TOP_HZ, fs=SR, output="sos"), rounded)


dry = scene()
out = record(dry)
to_wav(out)
```